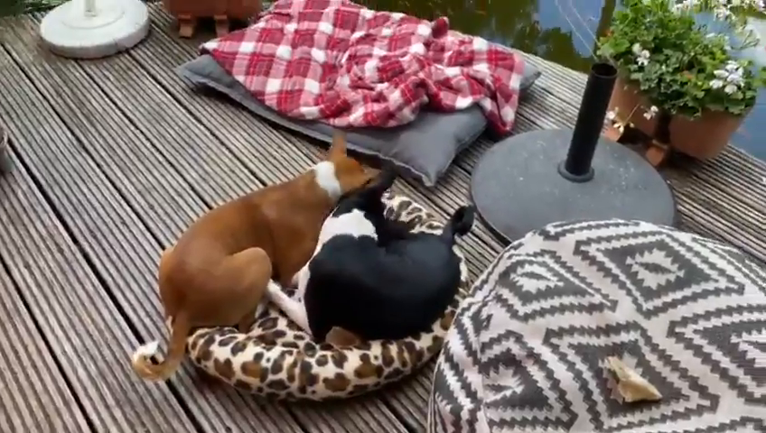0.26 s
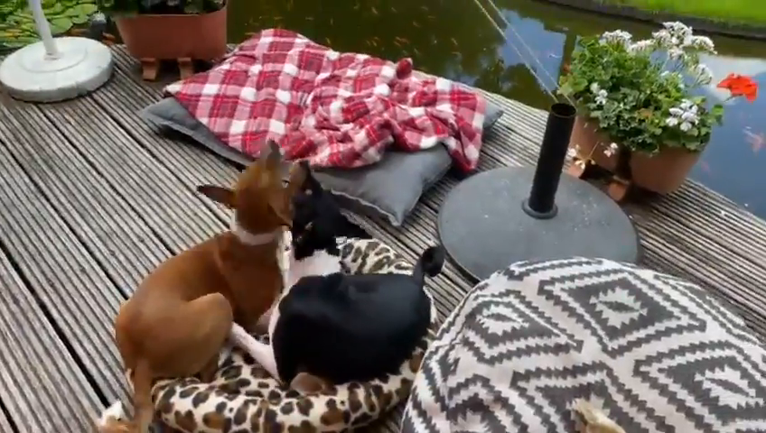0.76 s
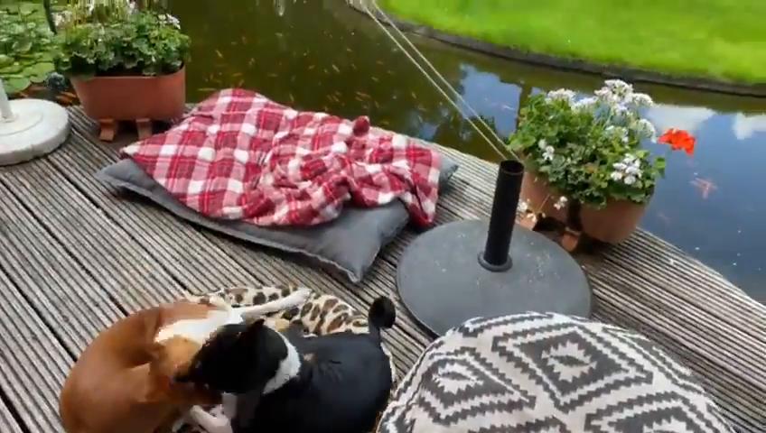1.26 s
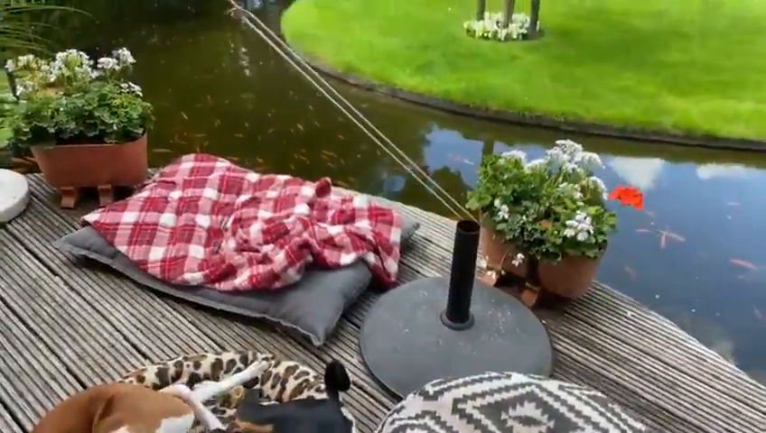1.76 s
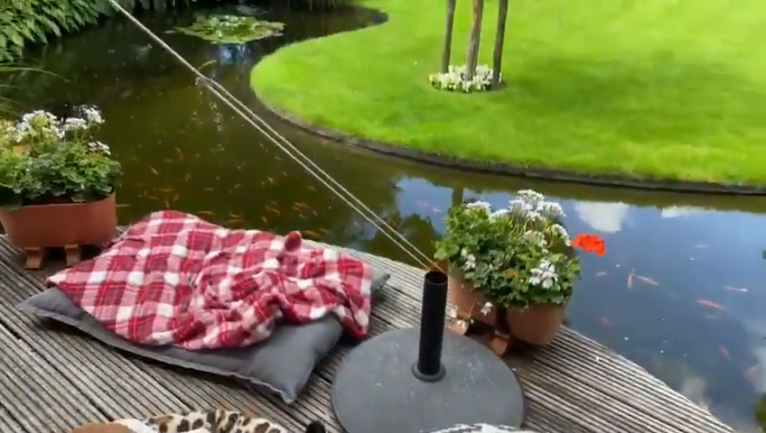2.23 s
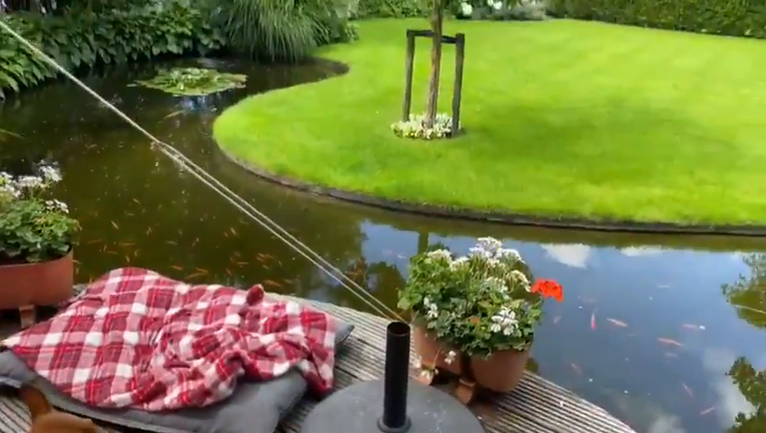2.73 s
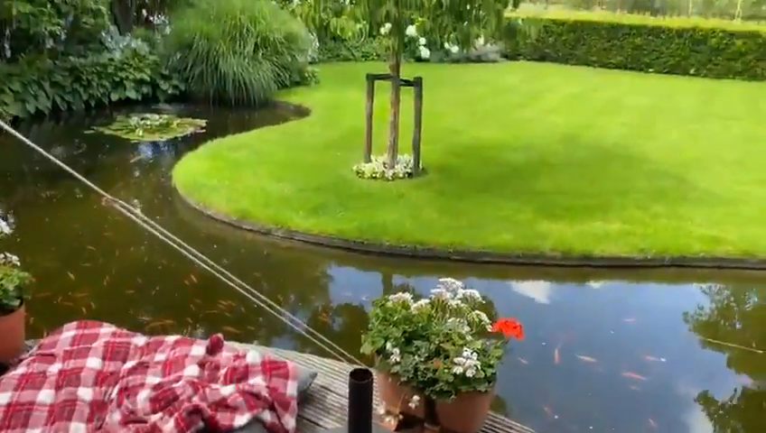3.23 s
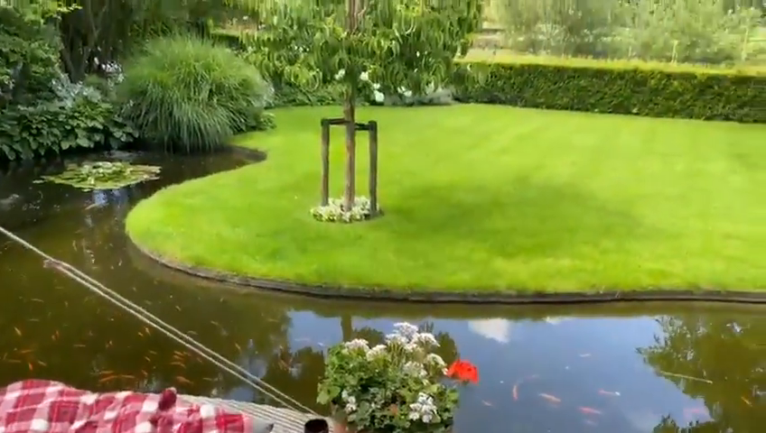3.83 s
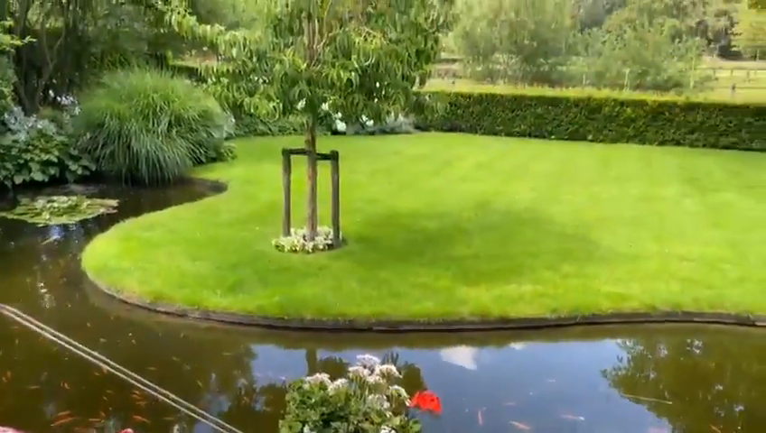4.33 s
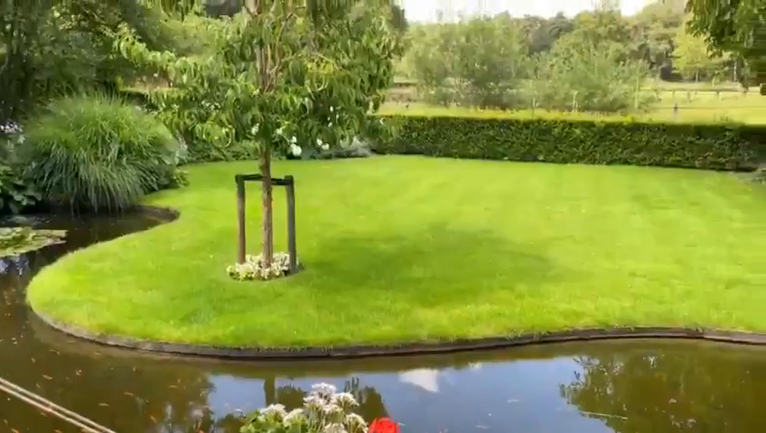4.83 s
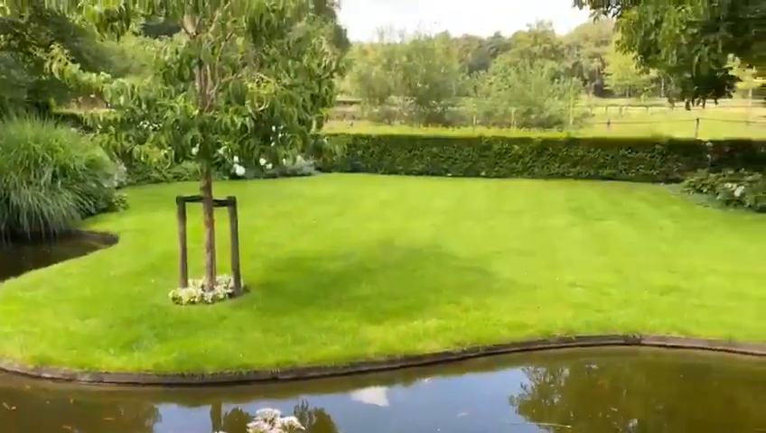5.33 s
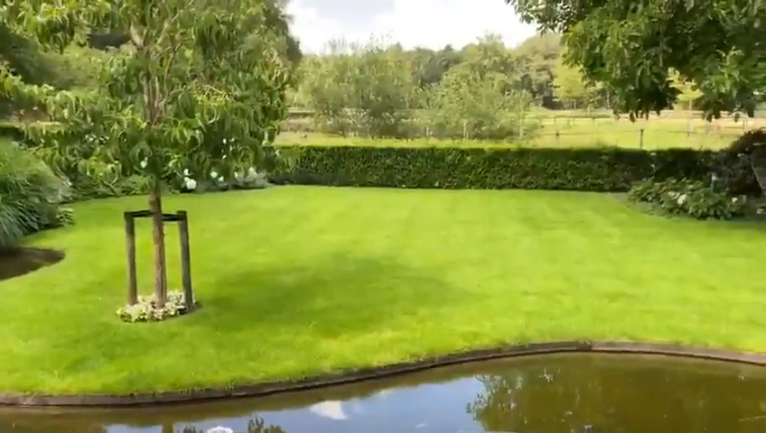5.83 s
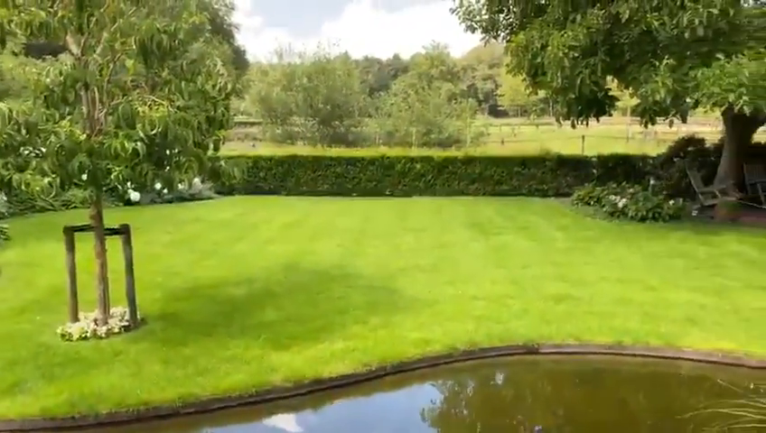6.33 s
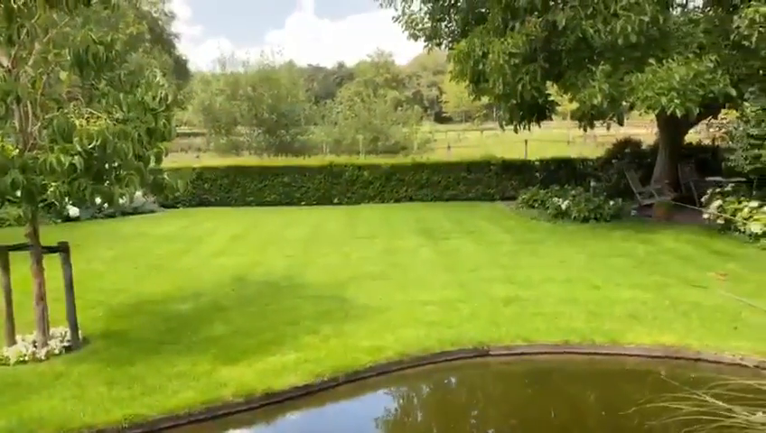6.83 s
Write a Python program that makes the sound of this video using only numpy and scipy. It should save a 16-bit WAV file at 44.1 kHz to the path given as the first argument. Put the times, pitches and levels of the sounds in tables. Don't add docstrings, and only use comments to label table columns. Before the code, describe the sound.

From 0 s a calm garden pond is heard: soft bubbling and single watery plinks a little to the left, faint bright leaf hiss, a low steady pump hum and a distant engine rumble. Around 0.87 s two light claw taps on a wooden deck come with a short rough grunt, then a quiet low growl at 1.03 to 1.17 s. At 2.04 s a dog yelps, extremely loud against the quiet: a clear whistling note plunging from about 2000 to 1200 Hz in under a tenth of a second, a tiny break, then a weaker, wavering lower note fading by 2.38 s, moving from centre to left. A brief echo and diffuse tail follow while the ambience ducks and recovers. From 2.5 s water trickles on, with a splash and rustle near 4.1 to 4.3 s. The stream leans further left, the engine sinks slightly, and tiny bright bubbles cluster from 5.6 s until 7 s.

```python
import sys
import numpy as np
from scipy import signal
from scipy.fft import rfft, irfft, next_fast_len
from scipy.io import wavfile
from scipy.ndimage import uniform_filter1d, map_coordinates

SR = 44100
rng = np.random.default_rng(int(sys.argv[2]) if len(sys.argv) > 2 else 0)


def wrap_up_sound(samples):
    columns = np.atleast_2d(samples).T
    tamed = np.clip(columns, -1, 1)
    steps = np.round(tamed * 32767).astype(np.int16)
    wavfile.write(sys.argv[1], SR, steps)


def ratio_of_db(decibels):
    return 10 ** (np.asarray(decibels, float) / 20)


N = 312228
TIME_S = np.arange(N) / SR


def unit(x):
    return x / np.sqrt(np.mean(x ** 2) + 1e-20)


def curves(rows):
    s, *cols = np.transpose(rows)
    return [np.interp(TIME_S, s, c) for c in cols]


def wobble(rate_hz):
    knots = rng.standard_normal(int(N * rate_hz / SR) + 4)
    return map_coordinates(knots, [np.arange(N) * rate_hz / SR])


def filtered(x, response):
    m = next_fast_len(N + SR // 2)
    return irfft(rfft(x, m) * response(np.fft.rfftfreq(m, 1 / SR)), m)[..., :N]


def along(points, hz):
    f, v = np.transpose(points)
    return np.interp(np.log(hz + 1), np.log(f), v)


def coloured(x, spectrum):
    return unit(filtered(x, lambda hz: ratio_of_db(along(spectrum, hz))))


def later(x, samples):
    return map_coordinates(x, [np.arange(N) - samples], order=2, mode="nearest")


def yelp_at_ports():
    # time in seconds, pitch in Hz, fundamental in dB, overtone in dB.
    yelp_notes = [
        [(2.041, 2007, -31.5, -67), (2.046, 1935, -8.5, -57), (2.0505, 1900, -10, -44), (2.0535, 1490, -6, -41),
         (2.067, 1476, -13.5, -49.5), (2.081, 1444, -10, -41), (2.085, 1347, -18, -43.5),
         (2.104, 1225, -28.5, -40), (2.12, 1264, -41, -32)],
        [(2.148, 1377, -31, -45.5), (2.158, 1277, -26.5, -43), (2.189, 1279, -32, -45.5),
         (2.22, 1115, -29, -31), (2.237, 1032, -38.5, -39.5), (2.253, 1024, -37, -35.5),
         (2.3, 930, -39.5, -36.5), (2.341, 1044, -33, -38.5), (2.364, 993, -40, -51.5)],
    ]
    # frequency in Hz, level in dB.
    third = [(2900, -21), (3400, -13), (3800, -15), (4200, -5), (4470, 7), (5200, -24)]
    # frequency in Hz, level in dB.
    mouth = [(3500, -8), (4150, -8), (4600, -30), (5300, -25), (6200, -20), (7600, -17), (8600, -30),
             (10800, -32)]
    # time in seconds, overtone gain in dB.
    catch = [(2.108, 1.5), (2.116, -14.5), (2.15, -12.5), (2.156, 2.5)]
    attack_s, release_s = .012, .02
    head_db, head_db_per_s, toss_db = -2, 23, 1.2
    shake_db, shake_hz, shake_from_s, shake_dies_s = 5.5, 30.5, 2.048, .09

    first, last = yelp_notes[0][0], yelp_notes[-1][-1]
    onset = (first[0] - attack_s, first[1], -70, -90)
    release = (last[0] + release_s, last[1], -60, -75)
    silence = (3.0, 1000, -120, -120)
    hz, db1, db2 = curves([onset, *yelp_notes[0], *yelp_notes[1], release, silence])
    db3 = db2 + along(third, 3 * hz)

    pan_db = head_db + head_db_per_s * (TIME_S - first[0]) + toss_db * wobble(70)
    since = np.maximum(TIME_S - shake_from_s, 0)
    pan_db = pan_db + shake_db * np.cos(2 * np.pi * shake_hz * since) * np.exp(-since / shake_dies_s)

    phase = 2 * np.pi * np.cumsum(hz * (1 + 0.0029 * wobble(150))) / SR
    fundamental = ratio_of_db(db1 + [pan_db / 2, -pan_db / 2]) * np.sin(phase)
    bend = np.clip(.0025 * (2 * hz - 1400), 0, 2) * [[0], [1]]
    second_partial = ratio_of_db(db2 + [[3], [.5]]) * np.sin(2 * phase - bend)
    third_partial = ratio_of_db(db3 + [[1.2], [3]]) * np.sin(3 * phase + [[0], [3.3]])
    top = sum(ratio_of_db(db3 + along(mouth, k * hz)) * np.sin(k * phase) for k in range(4, 10))
    overtones = second_partial + third_partial + top
    shimmer = 1 + .31 * np.array([wobble(250), wobble(250)])

    breath = coloured(rng.standard_normal(N), [(900, -32), (1500, -1), (4200, -4.0), (4600, -45.0),
                                               (7000, -17), (8200, -28.5), (11000, -20.5)])
    rasp = (ratio_of_db(db3 - 13) + ratio_of_db(db2 - 18)) * breath
    upper = overtones * shimmer * ratio_of_db(curves(catch)[0]) + rasp
    return np.sqrt(2) * (fundamental + upper) * (db1 > -69.9)


def garden_echo(voice):
    # delay in seconds, left in dB, right in dB.
    echoes = [(.098, -20, -22)]
    # frequency in Hz, t60 in seconds.
    garden = [(500, 0.34), (1500, 0.29), (5000, 0.16)]
    on = slice(2 * SR, 3 * SR)
    wet = ratio_of_db(-9)
    back = sum(np.roll(voice, round(s * SR)) * ratio_of_db([[left_db], [right_db]])
               for s, left_db, right_db in echoes)
    f, t, z = signal.stft(rng.standard_normal((2, SR // 2)), SR, nperseg=256)
    decay = ratio_of_db(-60 * t / along(garden, f)[:, None])
    tail = signal.istft(z * decay, SR, nperseg=256)[1]
    tail = tail / np.linalg.norm(tail[0])
    delayed = np.pad(voice[on], (600, 0))[None]
    back[:, on] += wet * signal.fftconvolve(delayed, tail, axes=1)[:, :SR]
    return back


def yelp(duck):
    near = yelp_at_ports()
    to_wall = near.mean(axis=0) * ratio_of_db(-30 * np.clip(TIME_S - 2.05, 0, 1))
    near[1] = later(near[1], 9.0)
    return near + duck * garden_echo(to_wall)


def grunts():
    # start in seconds, length in seconds, pulse rate in Hz, level in dB, fade in dB.
    grunt_rows = [
        (0.88, 0.038, 176.3, -25, 16.5),
        (1.03, 0.09, 88, -38, 2),
        (1.1, .065, 94.6, -39, 0),
    ]
    # centre in Hz, width in Hz, level in dB.
    resonances = [(129, 67, -1), (288, 98, 7), (730, 290, 3.5), (1600, 150, -2.5)]
    pulses = np.zeros(N)
    for s, length_s, hz, db, fade_db in grunt_rows:
        at = np.arange(0, length_s, 1 / hz)
        uneven = at + at * rng.normal(0, 0.043, len(at))
        pulse_db = db + 20.0 - fade_db * at / length_s + rng.normal(0, 2.2, len(at))
        pulses[((s + uneven) * SR).astype(int)] = ratio_of_db(pulse_db)

    def body(f):
        total = 0
        for k, (centre, width, db) in enumerate(resonances):
            band = 1j * f * width
            total = total + (-1) ** k * ratio_of_db(db) * band / (centre * centre - f * f + band)
        return total / (1 + 1j * f / 3000)

    return filtered(pulses, body)


def sideways():
    # time in seconds, left lead in samples.
    camera_turn = [(0, 2.3), (2.6, 5.4), (4.1, 9.6), (5.1, 10.8), (5.6, 13.6), (7.08, 15.35)]
    side_from, side_full = 3.93, 14.5
    lead, = curves(camera_turn)
    return lead, np.clip((lead - side_from) / (side_full - side_from), 0, 1)


def patchy(x, depth_db, swell_db=0, extra=0):
    z = signal.stft(x, nperseg=256)[2]
    field = uniform_filter1d(rng.standard_normal(z.shape[-2:]), size=4, axis=0)
    field = uniform_filter1d(field, size=14, axis=1)
    gain = ratio_of_db(depth_db * unit(field) + swell_db) + extra
    return signal.istft(z * gain, nperseg=256)[1][..., :N]


def bubbles(s, size, hz, life_s, count):
    t = np.arange(count) / SR
    u = t / life_s[:, None]
    envelope = np.e * 2 * u * np.exp(-2 * u)
    ring = size[:, None] * np.sin(2 * np.pi * hz[:, None] * t * (1 + 0.0068 * u)) * envelope
    where = (s * SR).astype(int)[:, None] + np.arange(count)
    return np.bincount(where.ravel(), ring.ravel(), N + SR)[:N]


def plinks():
    # start in seconds, peak in dB, frequency in Hz.
    drops = [(0.376, -44, 1550), (0.666, -38, 829), (0.812, -41, 1410), (1.121, -42, 673),
             (1.37, -41, 1370), (1.426, -40, 657), (1.55, -41, 1220), (1.748, -43, 1500),
             (1.937, -43, 1080), (1.97, -37, 1450), (1.997, -34, 1260), (2.609, -39, 1920),
             (2.704, -40, 1370), (2.733, -38, 1430), (2.855, -42, 1850), (3.043, -44, 1340),
             (3.131, -40, 956), (3.161, -42, 974), (3.358, -39, 867), (3.636, -40, 627), (4.057, -46, 1390),
             (4.229, -39, 1770), (4.487, -44, 1390), (4.595, -44, 603), (4.929, -40, 603),
             (5.457, -45, 651), (5.675, -43, 956), (6.171, -45, 1010), (6.82, -43, 950)]
    # start in seconds, peak in dB, frequency in Hz.
    tinkles = [(0.6285, -52, 2200), (1.4002, -52, 3790), (1.9674, -46, 2910), (2.4723, -48, 2390),
               (3.3824, -49, 2230), (4.0771, -46, 4480), (4.2303, -41, 2570), (4.2334, -41, 2390),
               (4.4862, -52, 3870), (4.8289, -54, 2600), (5.6544, -48, 2810), (5.7344, -47, 2380),
               (5.8616, -47, 2790), (5.9044, -56, 2410), (5.9309, -50, 2790), (6.0975, -49, 2290),
               (6.2063, -51, 4180), (6.344, -48, 2460), (6.3784, -46, 2570), (6.6054, -45, 2490),
               (6.7336, -48, 2620), (6.8494, -52, 2550)]
    # start in seconds, peak in dB, frequency in Hz.
    claws = [
        (.867, -38.5, 1600),
        (.895, -39, 1500),
    ]
    drop_gain_db, life_at_1khz_s = -1.5, .0045
    stray_db, stray_cycles = -51, 5
    s, peak_db, hz = np.transpose(drops + tinkles + claws)
    placed = bubbles(s, ratio_of_db(peak_db + drop_gain_db), hz, life_at_1khz_s * np.sqrt(1000 / hz), count=1800)
    stray = rng.random((45, 3))
    stray_hz = 800 * (1900 / 800) ** stray[:, 1]
    stray_size = ratio_of_db(stray_db + 6 * stray[:, 2])
    return placed + bubbles(stray[:, 0] * N / SR, stray_size, stray_hz, stray_cycles / stray_hz, count=1800)


def water():
    # frequency in Hz, level in dB.
    facing = [(100, -11), (250, -8), (450, -4.5), (700, -6.5), (1200, 1), (1500, 5), (1800, -2.5),
              (2400, -10), (2900, -19.5), (5000, -24.5), (8000, -29), (11500, -70)]
    # frequency in Hz, level in dB.
    side_colour = [(100, -2), (330, -13), (600, -4.5), (780, -11.5), (950, -1.5), (1180, -5.5), (1400, 0),
                   (1620, -4), (1870, 4.5), (2150, -11.5), (2500, -4), (3200, -23.5), (5000, -16),
                   (11500, -79.5)]
    # frequency in Hz, level in dB.
    scatter = [(150, -1.5), (500, 6), (1000, 4), (1600, -7), (2500, 3), (5000, 1.5)]
    # time in seconds, level in dB.
    flow = [(0, 0), (.7, 0.5), (1.5, -0.5), (2.6, 0), (3.2, 1.5), (3.8, 0), (4.5, 1), (5.3, 0), (6, 0.5),
            (6.5, -0.5), (7.08, -0.5)]
    facing_db, side_gain_db = -53, 2.5
    drop_lead = .4
    lead, share = sideways()
    db = facing_db + side_gain_db * np.sqrt(share) + curves(flow)[0]

    draw = rng.random((3000, 3))
    hz = 450 * (3500 / 450) ** draw[:, 1]
    size = ratio_of_db(np.minimum(-4 * np.log(draw[:, 2]), 11))
    crowd = bubbles(draw[:, 0] * N / SR, size * np.sqrt(hz / 1000), hz, 5 / hz, count=600)
    gurgle = ratio_of_db(1.9 * wobble(25) + 1.54 * wobble(4.83))
    raw = patchy(rng.standard_normal((3, N)), 2.3)
    raw[0] = gurgle * (unit(crowd) * 0.37 + 0.92 * raw[0])
    stream, *scattered = (1 - share) * coloured(raw, facing) + share * coloured(raw, side_colour)

    direct = ratio_of_db(db - 3.0) * stream
    single = plinks()
    around = filtered(np.array(scattered), lambda f: ratio_of_db(along(scatter, f)))
    return (np.array([direct, later(direct, lead)])
            + np.array([single, later(single, drop_lead * lead)])
            + ratio_of_db(db - 1.5 - 2 * share) * around)


def hiss():
    # start in seconds, peak in dB, centre in Hz, left-right in dB.
    splashes = [(1.2665, -49, 5940, 1.5), (1.3994, -54, 4120, 0), (1.7494, -56, 6530, 6),
                (1.9694, -51, 3500, 1), (2.3234, -48, 6800, 6), (2.3526, -54, 4190, 2),
                (2.473, -52, 3500, -1), (2.6596, -57, 4180, 0), (2.9696, -54, 4080, 0),
                (3.382, -53, 4250, -3), (3.4047, -49.5, 6860, 1.5), (4.0771, -44, 4480, 6),
                (4.1584, -55, 4480, 2), (4.2007, -54, 4210, 6), (4.2314, -46.5, 4010, 5),
                (4.4862, -53, 4790, 4), (4.7217, -55, 4100, -3), (4.8304, -50, 4650, -5),
                (5.014, -53, 4500, 4), (5.0794, -54, 4610, 3), (5.22, -50, 4890, 6), (5.965, -54, 6230, -1),
                (6.206, -57, 4220, 6), (6.5994, -58, 4260, 4)]
    # start in seconds, peak in dB, centre in Hz, t60 in seconds.
    rustles = [(4.21, -52, 4000, .5), (4.235, -51, 3000, .5), (4.27, -53, 4000, .4), (1.76, -58, 6000, .6),
               (2.46, -54, 7000, .3), (3.34, -59.5, 7000, .73), (6.735, -56, 6000, .2)]
    # time in seconds, level in dB.
    breeze = [(0.0, -70.5), (0.79, -67), (1.03, -73.5), (1.81, -74), (2.31, -66), (2.56, -70.5),
              (3.17, -69), (3.49, -69), (3.86, -75), (4.32, -74.5), (4.73, -76), (5.8, -67), (6.11, -74.5),
              (6.58, -71.5), (6.84, -70), (7.08, -71.5)]
    # frequency in Hz, level in dB.
    leaves = [(1500, -25.5), (2500, -10.5), (3500, 1), (5000, -4.5), (7500, -4), (8800, -11.5), (9500, -8),
              (10800, -15), (11500, -41.5)]
    leaves_db = -64
    splash_octaves, splash_t60_s = .85, .11
    rustle_octaves, rustle_pan_db = 1.9, 3

    flurry_db = curves(breeze)[0] - np.mean(breeze, axis=0)[1] + 2.4 * wobble(30) + 1.5 * wobble(6)
    bursts = [(s, db, hz, splash_octaves, splash_t60_s, pan_db) for s, db, hz, pan_db in splashes]
    bursts += [(s, db, hz, rustle_octaves, t60_s, rustle_pan_db) for s, db, hz, t60_s in rustles]
    hz = np.linspace(1, SR / 2, 129)[:, None]
    t = np.arange(-(-N // 128) + 1) * 128 / SR
    spray = np.zeros((3, 129, len(t)))
    for s, peak_db, centre_hz, octaves, t60_s, pan_db in bursts:
        decay = ratio_of_db(peak_db + 63.5 - 60 * np.maximum(t - s, 0) / t60_s)
        attack = np.clip((t - s) / 0.0014 + 0.54, 0, 1)
        band = np.exp(-(np.log2(hz / centre_hz) / octaves) ** 2)
        spray += decay * attack * band * ratio_of_db([[[0]], [[pan_db / 2]], [[-pan_db / 2]]])

    swell_db = np.interp(t, TIME_S, flurry_db)
    noise = patchy(rng.standard_normal((3, N)), 2.2, swell_db, spray)
    ahead, *ports = coloured(noise, leaves)
    share = np.clip(0.068 + 0.12 * sideways()[1], 0, 1)
    around = np.sqrt(1 - share) * np.array(ports) * ratio_of_db([[1.5], [-1.2]])
    return ratio_of_db(leaves_db) * (np.sqrt(share) * ahead + around)


def hum():
    # time in seconds, firing rate in Hz, line in dB, half-order drone in dB.
    engine_rows = [(0, 117.7, -66, -54), (1.5, 114.4, -63, -48), (2.5, 115.9, -65.5, -58),
                   (3.2, 115.3, -52, -52.5), (4.5, 112.7, -53.5, -49), (5.5, 112.9, -57, -51.5),
                   (6.3, 110.7, -60.5, -53.5), (7.08, 108.7, -71, -50.5)]
    # frequency in Hz, level in dB.
    air = [(20, -25.5), (35, -22), (50, -1), (80, -2), (130, -13), (170, -16), (300, -22.5), (600, -32),
           (1200, -54)]
    hz, line_db, drone_db = curves(engine_rows)
    phase = 2 * np.pi * np.cumsum(hz) / SR
    engine = ratio_of_db(line_db + 3.5 + 1.44 * wobble(5.3)) * np.sin(phase)
    half_order = (1.5 + wobble(9)) * np.sin(phase / 2) + wobble(6.7) * np.cos(phase / 2)
    drone = ratio_of_db(drone_db) * unit(half_order)
    pump = ratio_of_db(-56.0 + 1.4 * wobble(3.2)) * np.sin(2 * np.pi * 100 * TIME_S)
    common, *ports = coloured(rng.standard_normal((3, N)), air)
    rumble = ratio_of_db(-55) * (common + .5 * np.array(ports))
    return (engine + drone + pump + rumble) * ratio_of_db([[-3], [2.5]])


def scene():
    # time in seconds, gain in dB.
    duck_rows = [(2.045, -0.5), (2.07, -15), (2.3, -1.5), (2.45, -0.5), (2.9, -1.5)]
    duck = ratio_of_db(curves(duck_rows)[0])
    return yelp(duck) + grunts() + duck * (water() + hiss() + hum())


def roll_off(x):
    return signal.sosfilt(signal.butter(12, 11840, fs=SR, output="sos"), x)


def record(dry):
    ceiling, knee = .92, 9
    rounded = dry / (1 + np.abs(dry / ceiling) ** knee) ** (1 / knee)
    return roll_off(rounded)


dry = scene()
out = record(dry)
wrap_up_sound(out)
```